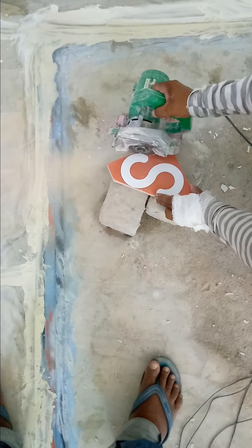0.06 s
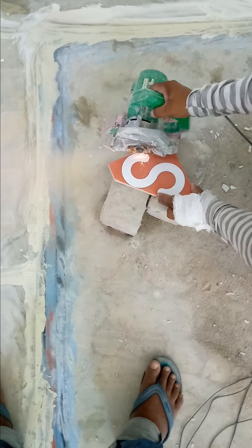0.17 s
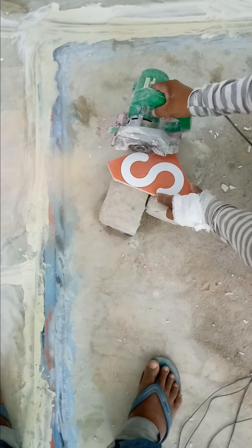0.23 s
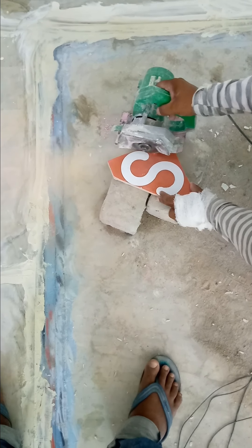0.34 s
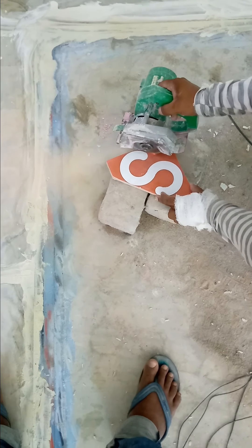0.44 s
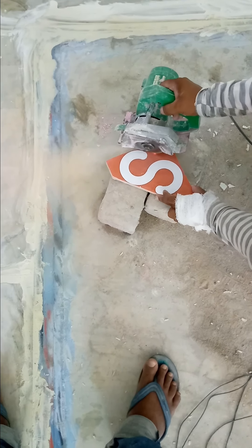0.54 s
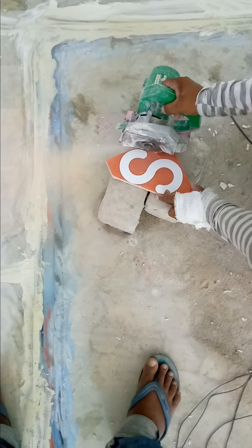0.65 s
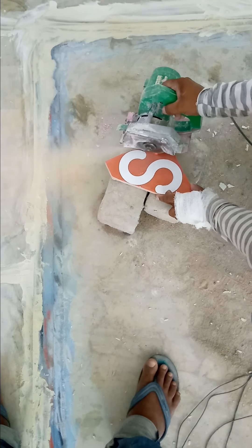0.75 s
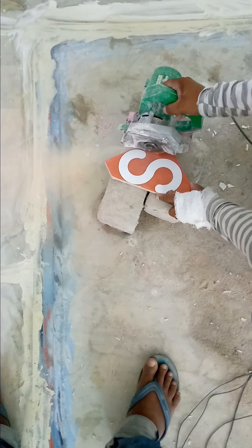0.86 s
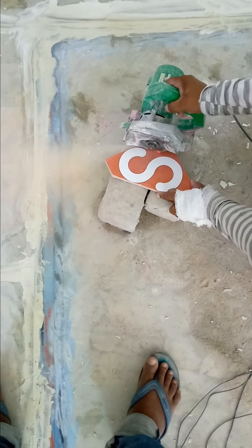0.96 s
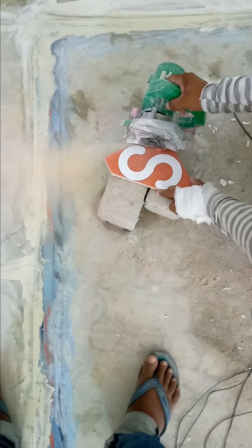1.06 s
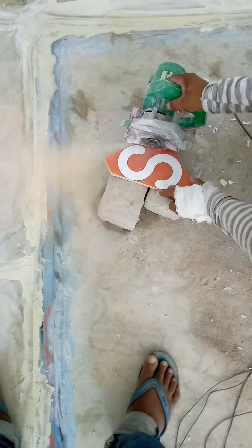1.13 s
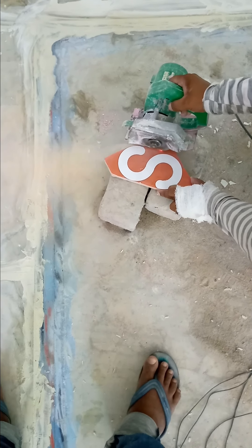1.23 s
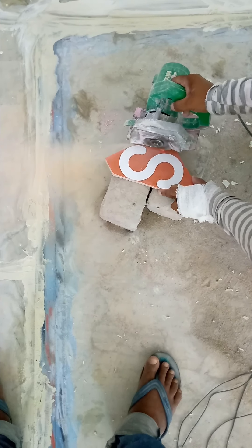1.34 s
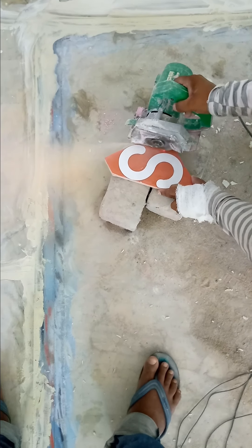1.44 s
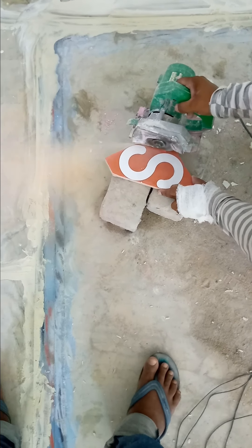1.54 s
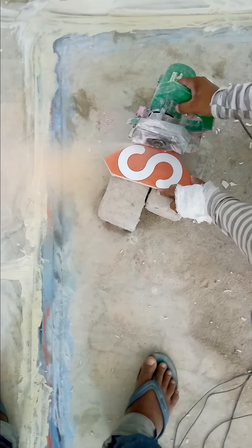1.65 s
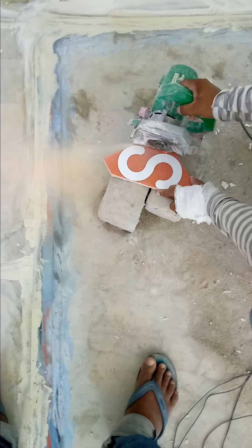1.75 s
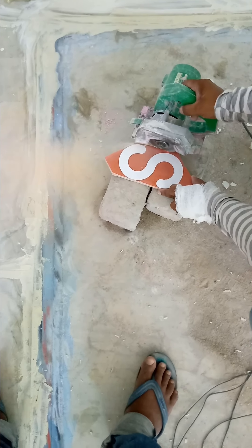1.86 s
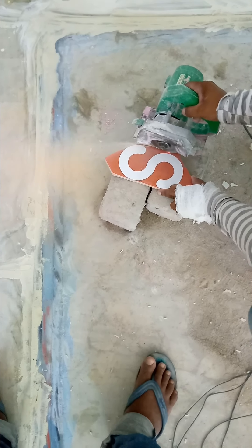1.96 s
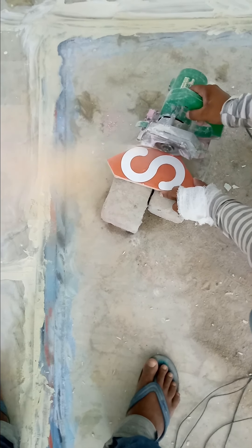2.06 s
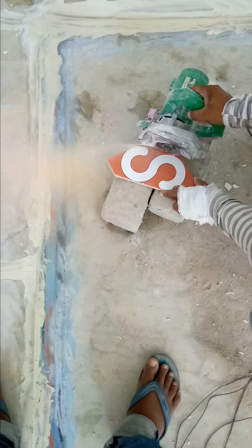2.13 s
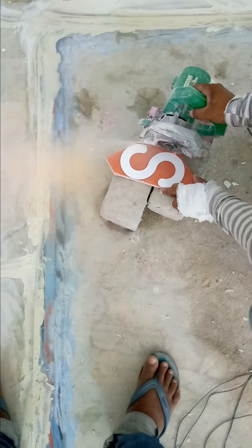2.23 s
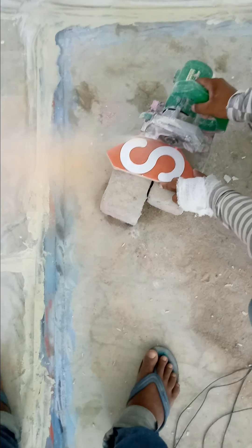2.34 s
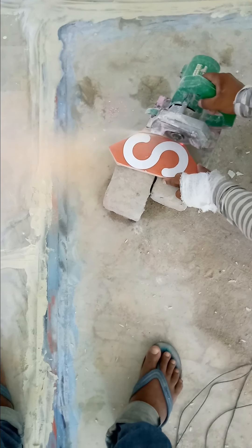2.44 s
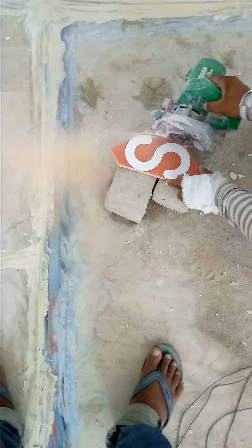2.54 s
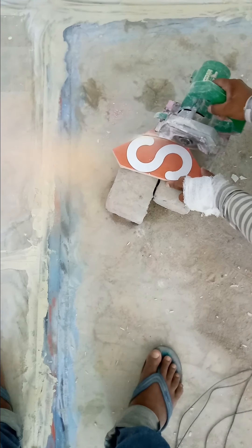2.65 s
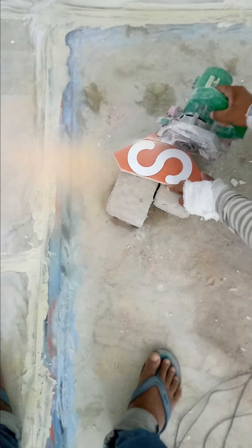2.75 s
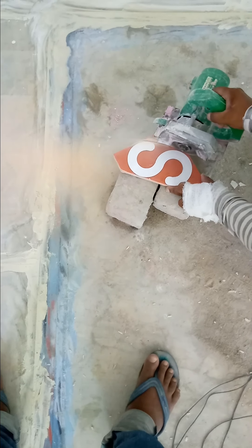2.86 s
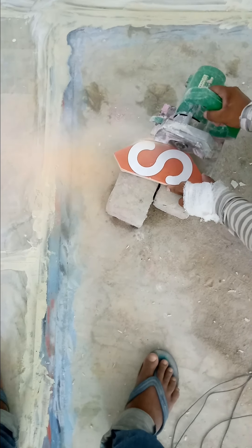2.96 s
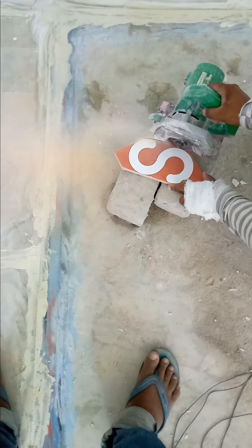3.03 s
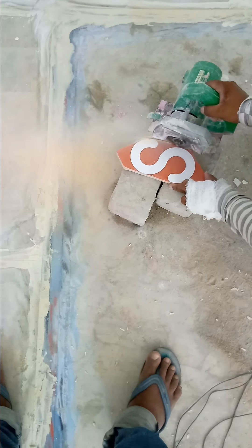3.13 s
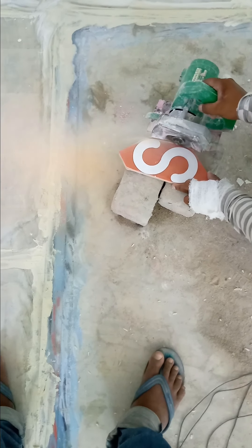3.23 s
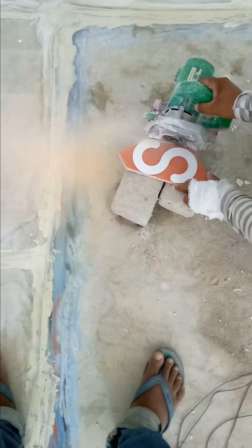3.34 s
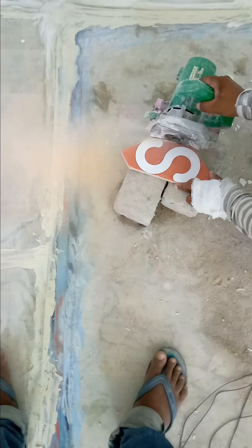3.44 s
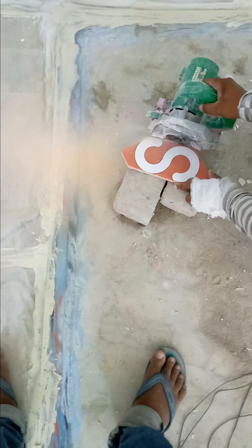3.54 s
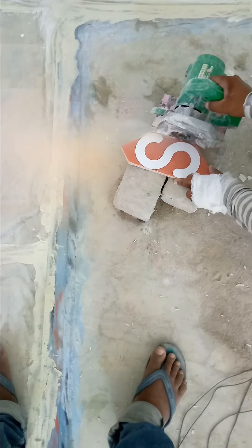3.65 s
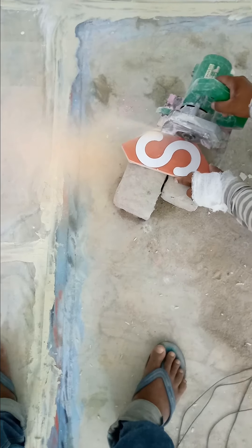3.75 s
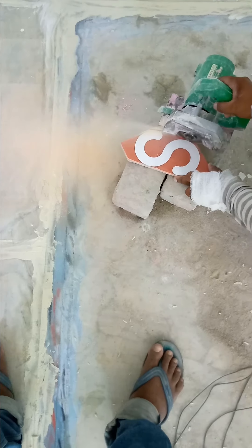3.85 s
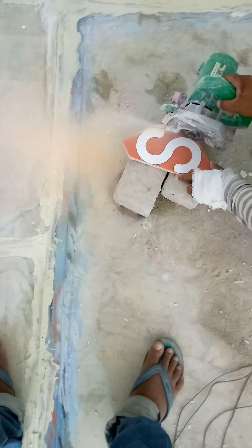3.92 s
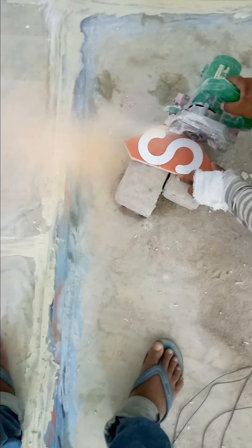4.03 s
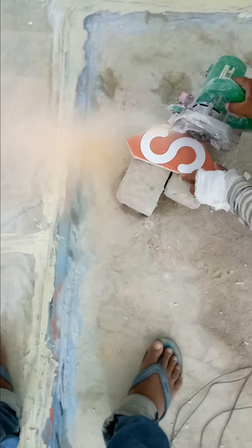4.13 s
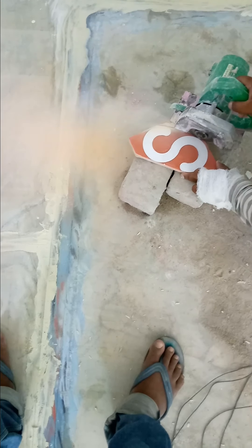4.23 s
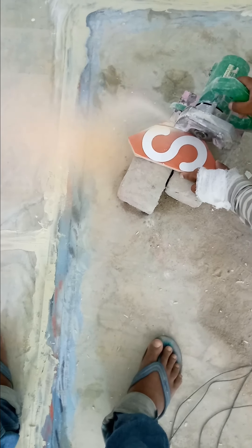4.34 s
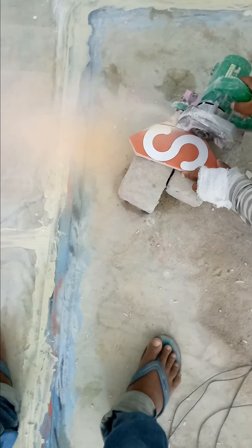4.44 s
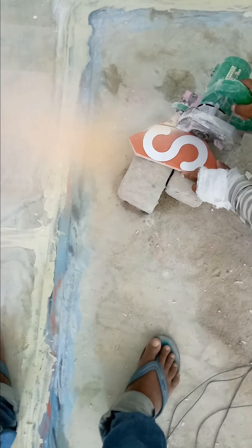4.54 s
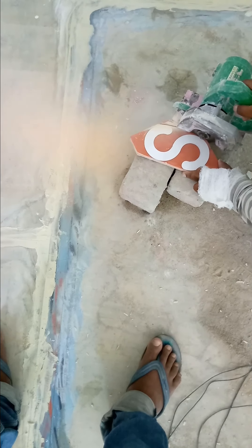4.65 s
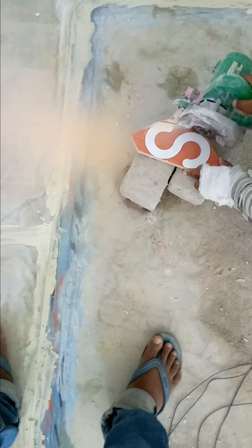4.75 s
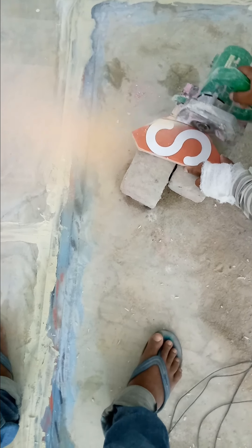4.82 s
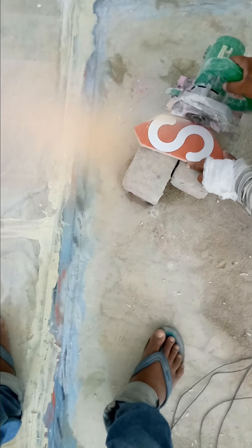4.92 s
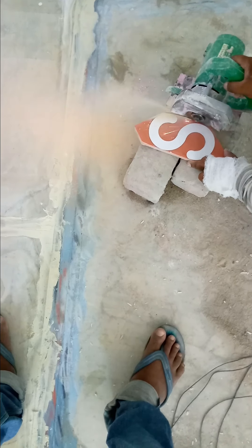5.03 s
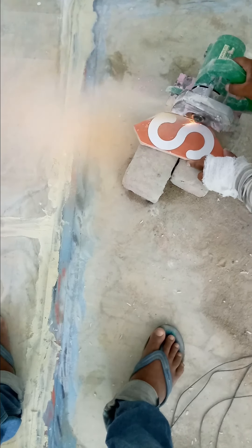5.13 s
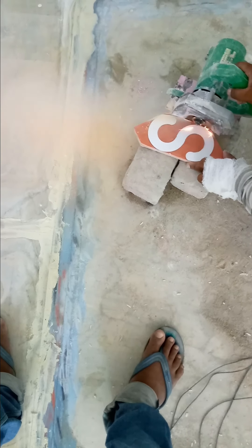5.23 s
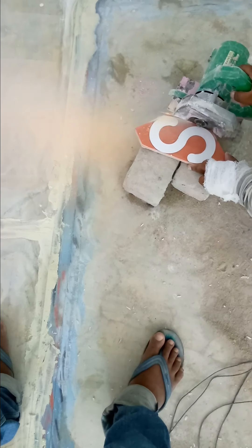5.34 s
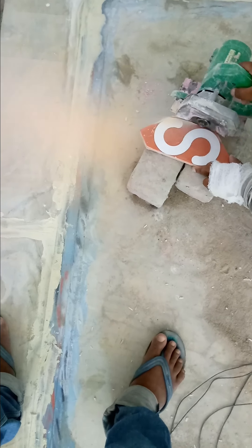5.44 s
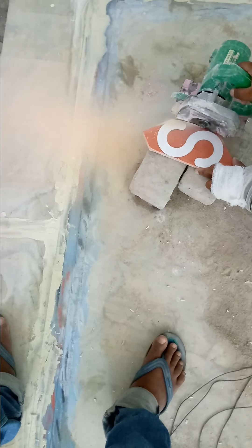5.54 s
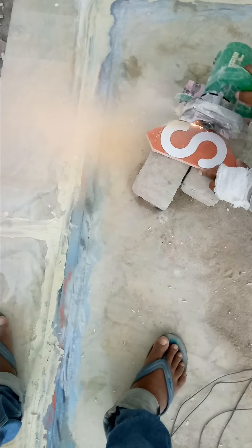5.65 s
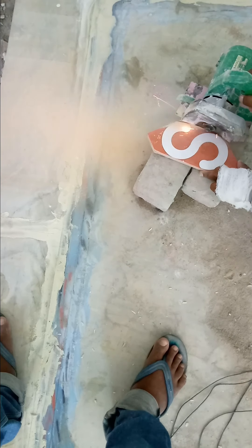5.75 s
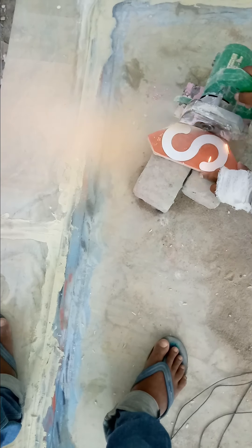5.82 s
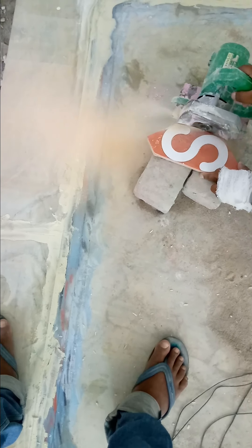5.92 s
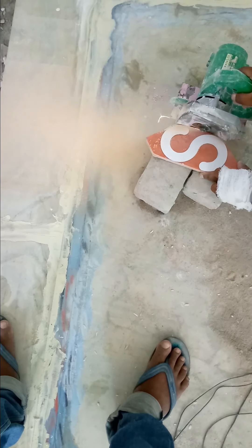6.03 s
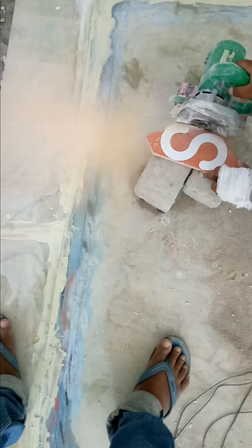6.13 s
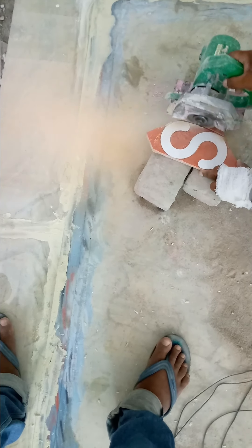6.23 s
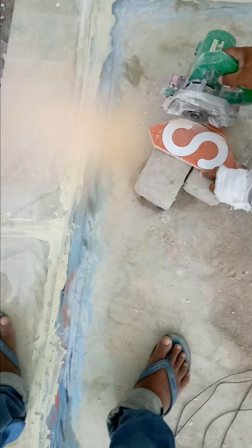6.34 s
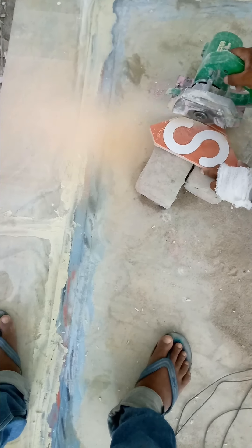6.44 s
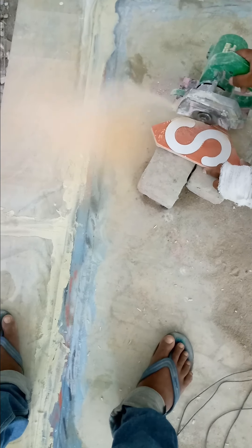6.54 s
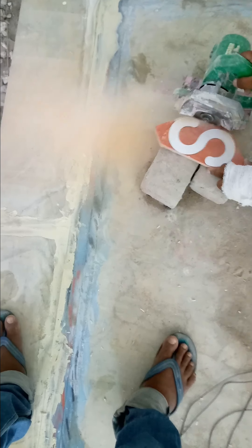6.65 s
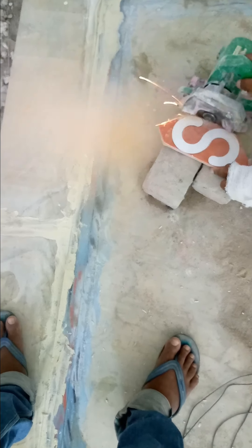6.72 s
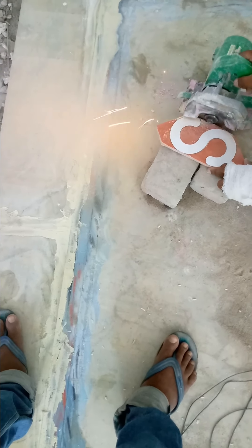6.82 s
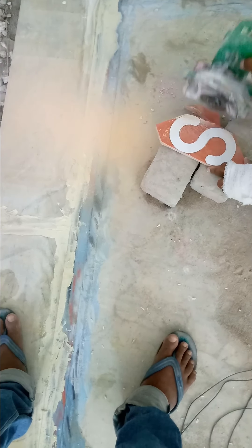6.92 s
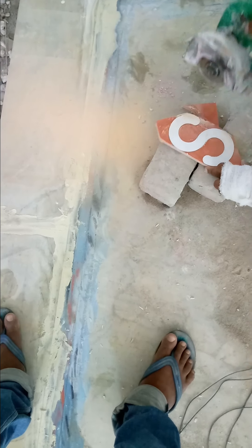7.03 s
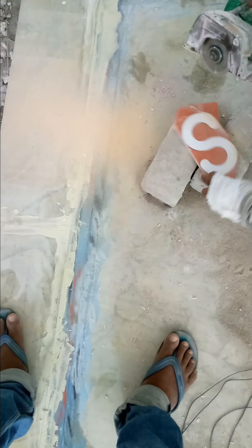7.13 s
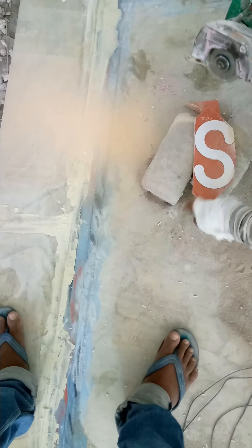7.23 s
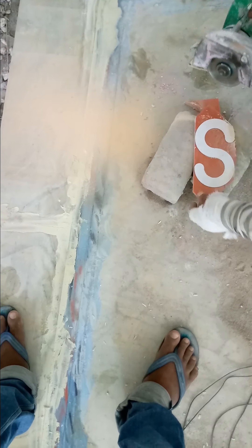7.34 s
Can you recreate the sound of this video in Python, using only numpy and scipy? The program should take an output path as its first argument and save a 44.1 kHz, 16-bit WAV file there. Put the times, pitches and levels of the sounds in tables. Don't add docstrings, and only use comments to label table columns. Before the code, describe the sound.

A spinning steel blade shrieks against a stone slab, dry and within arm's reach. The continuous harsh scream flutters roughly, carrying stony grit, fizzing highs and motor rush, while pressure makes it surge and ease. Irregular catches jolt the overloaded microphone into dull bass thumps and crackles, thickest around four seconds. Near the end the cut breaks off, resumes briefly, breaks into quick scrapes and leaves a quieter free-spinning whir.

```python
import sys
import numpy as np
from scipy import signal
from scipy.fft import rfft, irfft, next_fast_len
from scipy.io import wavfile
from scipy.ndimage import uniform_filter1d

SR = 44100
rng = np.random.default_rng(int(sys.argv[2]) if len(sys.argv) > 2 else 0)


def inscribe(sig):
    pcm = np.round(np.clip(np.atleast_2d(sig).T, -1, 1) * 32767)
    wavfile.write(sys.argv[1], SR, pcm.astype(np.int16))


def undo_db(level):
    steps = np.asarray(level, float) / 20
    return 10 ** steps


N = 325458
SIZE = next_fast_len(N)
HZ, T = np.fft.rfftfreq(SIZE, 1 / SR), np.arange(N) / SR
CRUMBLE_S = 0.066


def evened(x):
    return x / np.sqrt(np.mean(x ** 2) + 1e-20)


def wander(rate_hz):
    count = N // 64 + 2
    spectrum = rfft(rng.standard_normal(count))
    f = np.fft.rfftfreq(count, 64 / SR)
    slow = irfft(spectrum / (1 + (f / rate_hz) ** 2), count)
    return evened(np.interp(T, np.arange(count) * 64 / SR, slow - slow.mean()))


def ramp(start_s, rise_s):
    return np.clip((T - start_s) / rise_s, 0, 1)


def level_db(layer, hiss=0, bite_s=0.0027, linger=0.99):
    # (middle [s], spread [s], pressure [dB])
    pushes = [(0.0, 0.022, -5.5), (0.2, 0.06, -6), (0.38, 0.12, 3), (0.82, 0.045, 6), (0.86, 0.25, -6.7),
              (1.06, 0.019, 5), (1.14, 0.028, -2.5), (1.32, 0.023, 7), (1.46, 0.05, 5), (1.62, 0.11, -4.5),
              (1.9, 0.027, 2), (2.58, 0.062, -7), (3.06, 0.16, 4.5), (3.16, 0.056, -4.2), (3.26, 0.012, 5),
              (3.42, 0.074, -5), (3.64, 0.018, 4.1), (3.8, 0.04, 5), (3.96, 0.028, -7), (4.04, 0.11, 10),
              (4.34, 0.019, 2.5), (4.46, 0.018, -4.5), (4.62, 0.066, -10.5), (4.86, 0.062, 6),
              (5.2, 0.072, -12.2), (5.36, 0.039, 6), (5.6, 0.039, -9.5), (5.72, 0.046, 3.5),
              (5.94, 0.024, -9.4), (6.38, 0.068, 5.5)]
    # (time [s], depth [1], lean [1], twist [1])
    hand = [(0.0, -1.2, 0.47, -0.7), (0.95, -0.5, 0.8, 1.2), (2.2, -1.54, 0.7, -0.12),
            (2.7, 0.1, -0.5, 1.3), (2.8, -0.8, 0.9, -1.7), (3.1, 0, 0.7, 0), (3.55, -1.09, -0.7, -0.5),
            (4.15, 0.65, 0.7, 0), (4.4, 1.1, -1, -0.3), (4.5, 2.5, -0.35, 0.47), (4.7, -0.7, -2, -2),
            (4.9, 1.3, 1.5, -1.4), (5.15, 1.6, 1, 2.5), (5.3, 0.5, -1.3, -2.2), (5.5, 1.27, 2.1, 0),
            (5.8, 1.9, 0.5, -0.42), (6.3, 0, -0.5, 2), (6.5, 2, 1.2, -0.5)]
    # (level [dB], per pressure [dB/dB], per depth [dB], per lean [dB], per twist [dB])
    follow = dict(low=(-21.5, 0.17, -0.8, -0.7, 0.7), high=(-24, 0.33, -1.6, -0.24, -1.26),
              rasp=(-30, 0.11, 1.97, -.5, -.1), side=(-30.5, 0.35, -0.8, 0.6, 1.6),
              fizz=(-37, 0.02, -0.6, 1.7, -0.1), edge=(-37, 0.14, 2.5, -0.6, 0.8),
              top=(-32.5, 0.2, -.3, 1.4, 0.3), thump=(-39.5, 0.96, -0.5, -0.65, 0.2),
              scrape=(-35, 0.52, 0, 0.7, 0.5), drone=(-43, 0.63, 0.86, 2.5, -1.3),
              air=(-42.5, 0.07, -0.2, -0.5, 0.1), spark=(-41, 0.2, 2.2, -5.5, 1.7))
    # (skimming [dB], spinning free [dB], drift as it swings away [dB/s])
    lifted = dict(low=(-31.5, -31, .3), high=(-38, -40.5, 13), rasp=(-31.5, -30.5, -25),
              side=(-41.5, -55, 5), fizz=(-42.5, -53, -8), edge=(-43.5, -58, -5), top=(-41, -48, .3),
              thump=(-62, -66, -6.5), scrape=(-47.5, -48, .3), drone=(-49, -80, .3), air=(-38, -32, 3.2),
              spark=(-48, -43, 5))
    # (start [s], fall [s], end [s], extra loss of the hiss [dB])
    skims = [
        (6.083, 0.029, 6.195, -4.5),
        (6.495, .012, 9, -1),
    ]
    free_at_s, free_rise_s = 6.715, 0.047

    pose_s, *pose = np.transpose(hand)
    base_db, per_push, *per_pose = follow[layer]
    skim_db, free_db, drift = lifted[layer]
    coarse = T[::64]
    push_db = sum(db * np.exp(-.5 * ((coarse - mid) / spread) ** 2) for mid, spread, db in pushes)
    pose_db = np.interp(coarse, pose_s, np.dot(per_pose, pose))
    db = np.interp(T, coarse, base_db + per_push * push_db + pose_db)
    for start, fall, end, loss_db in skims:
        skimming = ramp(start, fall * linger) * (1 - ramp(end, bite_s))
        db = db + skimming * (skim_db + hiss * loss_db - db)
    freed_db = free_db + drift * (T - free_at_s)
    return db + ramp(free_at_s, free_rise_s * linger) * (freed_db - db)


def bent(x, ring_index, share, loose_hz):
    # (time [s], low ring shift [Hz], high ring shift [Hz])
    bend = [(0, 10, 45), (0.801, -5, 25), (1.4, -45, -60), (2.1, -40, 20), (2.6, -35, -5), (2.85, 70, -5),
            (3.199, 85, -65), (3.5, 25, 15), (4, 70, -30), (4.3, 50, 45), (4.9, 30, 5), (5.3, 45, -5),
            (5.5, 70, -100), (6.1, 20, -90), (6.2, -20, -10), (6.45, 60, -30), (6.6, -89.5, -19.5),
            (7.38, -61, 84.5)]
    rows = np.transpose(bend)
    shift_hz = share * np.interp(T, rows[0], rows[1 + ring_index]) + loose_hz * wander(2.2)
    return (signal.hilbert(x, SIZE)[:N] * np.exp(2j * np.pi * np.cumsum(shift_hz) / SR)).real


def ring(drive, modes, drift_db, steep=1.0):
    out = np.zeros(N)
    for hz, width, db in modes:
        resonance = (1 + 1j * (HZ - hz) / (width / 2)) ** -steep
        shape = resonance * HZ / (HZ - 300j)
        struck = rfft(drive * np.sign(rng.random(N) - .5), SIZE)
        out += undo_db(db + drift_db * wander(3.3)) * irfft(struck * shape, SIZE)[:N]
    return out


def grit(wobble, grain_db, flicker_db):
    shaft_hz = 187.6 * (1 + 0.0025 * wander(2.8))
    grains = rng.standard_normal(N) * undo_db(grain_db * np.minimum(rng.exponential(1, N), 5))
    turn = 1 + wobble * np.cos(2 * np.pi * np.cumsum(shaft_hz) / SR)
    return evened(grains * turn * undo_db(flicker_db))


def catches(extra_db):
    # (time [s], thump [dB], rebounds [count])
    hard_catches = [(0.8273, -19, 0.5), (1.2056, -20.5, 0.5), (1.3025, -15, 3), (1.416, -17.5, 0.5),
                    (1.6976, -16, 0), (1.7593, -19, 0), (1.917, -18, -0.5), (1.9969, -19.5, -0.5),
                    (2.3544, -14.5, 0), (2.6685, -18.5, -0.5), (2.7658, -17.5, 0.5), (3.259, -13, 0),
                    (3.6359, -16, 0), (3.7765, -14.5, 0), (3.8342, -18.5, 2.5), (3.894, -15, 4),
                    (3.983, -18.5, 1), (4.0504, -21, 0), (4.063, -15, 6), (4.1192, -14, 0),
                    (4.1492, -15, 2.5), (4.205, -15, 0), (4.246, -18.5, 2.5), (4.288, -14.5, -0.5),
                    (4.3456, -11.5, 0), (4.8329, -11.5, 0.5), (4.8559, -16, -0.5), (5.6699, -16.5, 0),
                    (6.0637, -16, -0.5), (6.3576, -17, 1)]
    rebound_s, rebound_db = .0085, -1.5
    jolts = np.zeros(N)
    for s, db, rebounds in hard_catches:
        k = np.arange(round(rebounds) + 1)
        jolts[np.round((s + k * rebound_s) * SR).astype(int)] = undo_db(db + extra_db + k * rebound_db)
    return jolts


def motor():
    # (frequency [Hz], density [dB per Hz])
    air = [(60, -38), (200, -22), (400, -8.5), (650, -1), (900, -0.5), (1250, 1.5), (1900, -7.5),
           (3500, -7), (4500, -8.5), (5800, -3.5), (7000, -13), (8500, -22.5), (13000, -29), (15500, -23)]
    # (frequency [Hz], width [Hz], level [dB])
    contacts = [(14900, 1200, 4), (14860, 340, -3)]
    f, db = np.transpose(air)
    colour = undo_db(np.interp(np.log(HZ + 1), np.log(f + 1), db))
    rush = irfft(rfft(grit(0.073, .8, 1.15 * wander(40.)), SIZE) * colour, SIZE)[:N]
    spark = ring(grit(0.41, 2.1, 4.9 * wander(60.)), contacts, .5, 3.0)
    rush = undo_db(level_db("air", hiss=0.76, bite_s=CRUMBLE_S)) * evened(rush)
    return rush + undo_db(level_db("spark")) * evened(spark)


def scrape():
    # (frequency [Hz], width [Hz], level [dB])
    slab_modes = [(650, 2250, -5), (1800, 690, -6), (3360, 580, 1.5), (3850, 590, -3)]
    # (frequency [Hz], width [Hz], level [dB])
    slab_note = [(1335, 400, 0)]
    splinter = np.exp(-np.arange(400) / SR / 0.00094)
    splinters = 1 + signal.oaconvolve(catches(20.5), splinter)[:N]
    crumbs = grit(0.021, 4.7, 1.07 * wander(72.0))
    drone = bent(evened(ring(crumbs, slab_note, 0.93, 1.65)), ring_index=1, share=.3, loose_hz=45)
    drone = undo_db(level_db("drone", bite_s=CRUMBLE_S)) * drone
    rubble = evened(ring(splinters * crumbs, slab_modes, 0.74))
    return undo_db(level_db("scrape", bite_s=CRUMBLE_S)) * rubble + drone


def blade():
    # (frequency [Hz], width [Hz], level [dB])
    low_modes = [(5990, 200, 0), (5760, 260, -7), (6200, 250, -11)]
    high_modes = [(6515, 135, 0), (6400, 150, -7), (6660, 150, -11)]
    rasp_modes = [(4532, 108, -6), (4933, 730, -5.5), (5127, 140, -2), (5464, 260, 2)]
    side_modes = [(7090, 105, 0), (7455, 85, -3), (7820, 110, -9), (8240, 110, -15), (7500, 600, -14)]
    fizz_modes = [(9000, 166, -6.5), (9920, 290, -13), (12430, 650, -11.5), (13350, 280, -19)]
    edge_modes = [(11160, 310, -4.5), (11640, 360, -10.5)]
    top_modes = [(14250, 90, -5), (14750, 450, -8), (15150, 220, 0), (15430, 200, -7)]
    # (time [s], boost [dB], length [s], further boost of the edge hum [dB])
    brushes = [
        (6.143, 6.5, 0.06, -4),
        (6.528, 1, .01, 3),
        (6.556, 6.5, 0.026, 0),
        (6.611, 6.5, 0.013, -5),
        (6.626, 4, 0.0064, 1),
        (6.651, 7, 0.023, -6),
        (6.692, 7, 0.0083, 10),
    ]
    touch = []
    for s, _, length, _ in brushes:
        touch.append(np.clip(np.minimum((T - s) / .0004, (s + length - T) / .004 + 1), 0, 1))
    brush_db, sharp_db = np.transpose(brushes)[1::2] @ touch
    surge = 1 + signal.oaconvolve(catches(2.5), np.hanning(91), "same")
    chatter = wander(63.0)
    press = grit(0.17, 1.7, 0.24 * chatter)
    spray = grit(0.2, 3.1, 0.34 * chatter + 0.58 * wander(170.0))

    low = bent(evened(ring(press, low_modes, 0.51, 1.56)), ring_index=0, share=1.05, loose_hz=8)
    high = bent(evened(ring(press, high_modes, 0.81, 1.53)), ring_index=1, share=1.05, loose_hz=8)
    scream = undo_db(level_db("low")) * low + undo_db(level_db("high")) * high
    rasp = bent(evened(ring(press, rasp_modes, 1.0, 1.87)), ring_index=0, share=1.2, loose_hz=30.01)
    rasp = undo_db(level_db("rasp", hiss=1.3, linger=1.3, bite_s=0.035)) * rasp
    side = undo_db(level_db("side", linger=2.8)) * evened(ring(press, side_modes, 1.0, 1.21))
    fizz = bent(evened(ring(spray, fizz_modes, 1.7, 1.01)), ring_index=0, share=.4, loose_hz=25)
    fizz = undo_db(level_db("fizz", hiss=1.05, linger=1.9, bite_s=.03) - .4 * brush_db) * fizz
    edge = bent(evened(ring(spray, edge_modes, 0.83, 1.26)), ring_index=0, share=1.3, loose_hz=59.86)
    edge = undo_db(level_db("edge", hiss=.9, linger=1.5, bite_s=0.016) + sharp_db) * edge
    glint = evened(ring(spray, top_modes, 1.3, 1.28))
    glint = undo_db(level_db("top", hiss=.6) - .3 * brush_db) * glint
    contact = undo_db(brush_db + 0.62 * wander(17.0))
    return surge * contact * (scream + rasp + side + fizz + edge + glint)


def scene():
    return (motor() + scrape() + blade())[None]


def sag(jolts, spike=1.0, dip_s=0.00018, tail_s=0.0018, tail=1.0, corner_hz=111.0, q=0.92):
    t = np.arange(600) / SR
    dip = (t / dip_s) ** 2 * np.exp(2 - 2 * t / dip_s)
    dip += tail * (1 - np.exp(-t / dip_s)) * np.exp(-t / tail_s)
    dip -= spike * np.exp(-((t - .00005) / .00005) ** 2)
    s = 1j * HZ / corner_hz
    bass_cut = s ** 2 / (s ** 2 + s / q + 1)
    return -irfft(rfft(signal.oaconvolve(jolts, dip)[:N], SIZE) * bass_cut, SIZE)[:N]


def top_cut(x):
    return signal.sosfilt(signal.butter(12, 16710, fs=SR, output="sos"), x)


def record(dry):
    # (low corner [Hz], upper limit [Hz])
    band_hz = (27, 15505)
    x = dry[0]
    thump_db = level_db("thump", bite_s=0.038) + 2.5 + 0.83 * wander(13.0)
    loudness = np.sqrt(abs(uniform_filter1d(x ** 2, size=4001)) + 1e-12)
    excess = np.clip(x / loudness - 2.0, 0, 1.3)
    kicks = evened(sag(excess ** 0.53))
    kicks /= (uniform_filter1d(kicks ** 2, size=1501) + .3) ** .4
    thumps = undo_db(thump_db - 1.0) * evened(kicks)
    under = np.clip(-x / loudness - 3.0, 0, .9)
    crackle = undo_db(thump_db + 1.0) * evened(signal.oaconvolve(under, np.hanning(9))[:N])
    kicked = x + thumps + crackle + sag(catches(-2.5))
    ceiling = .44
    flat = kicked / (1 + (abs(kicked) / ceiling) ** 4) ** .25
    passed = (HZ < band_hz[1]) * HZ ** 2 / (HZ ** 2 + band_hz[0] ** 2)
    heard = irfft(rfft(flat, SIZE) * passed, SIZE)[:N]
    return top_cut(heard[None])


dry = scene()
out = record(dry)
inscribe(out)
```